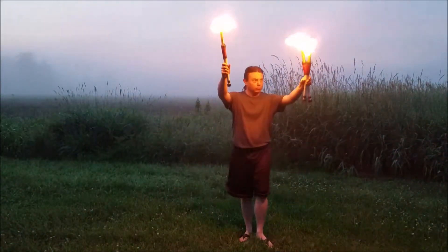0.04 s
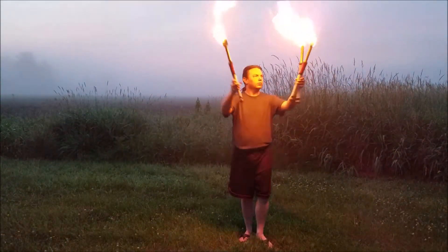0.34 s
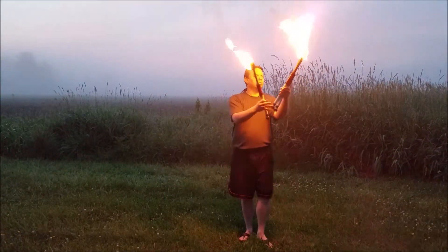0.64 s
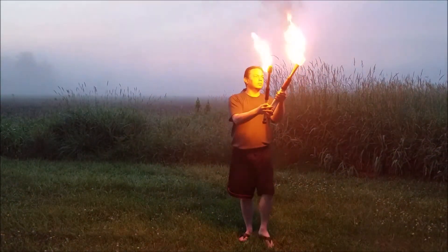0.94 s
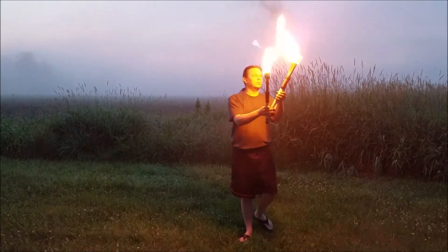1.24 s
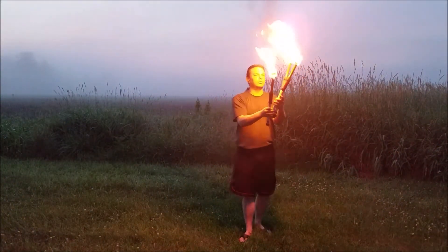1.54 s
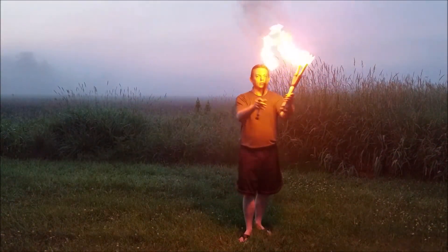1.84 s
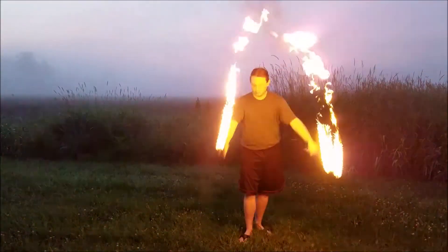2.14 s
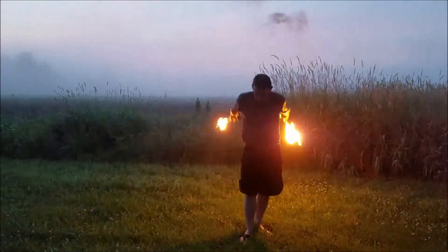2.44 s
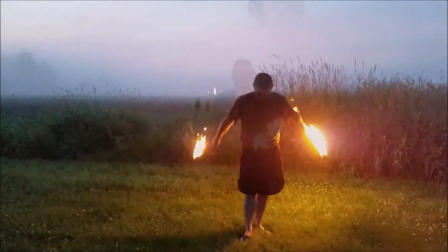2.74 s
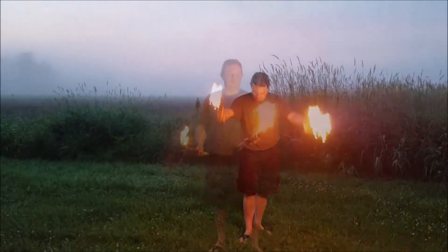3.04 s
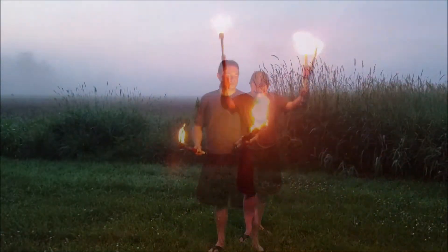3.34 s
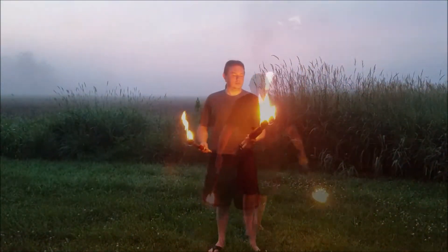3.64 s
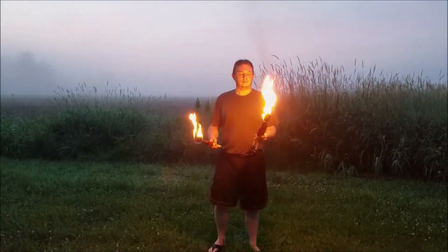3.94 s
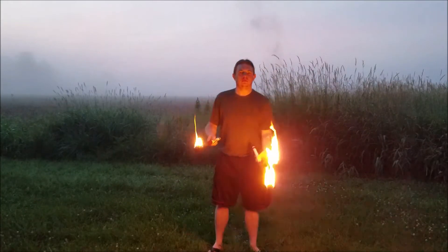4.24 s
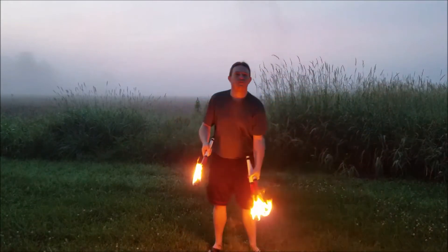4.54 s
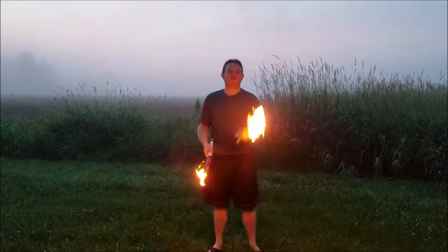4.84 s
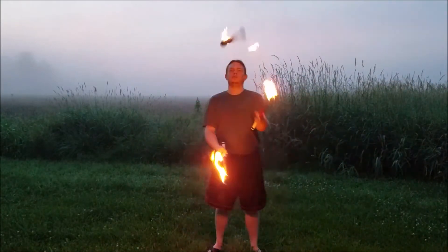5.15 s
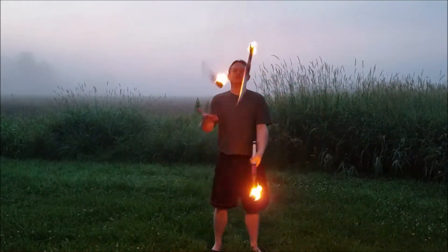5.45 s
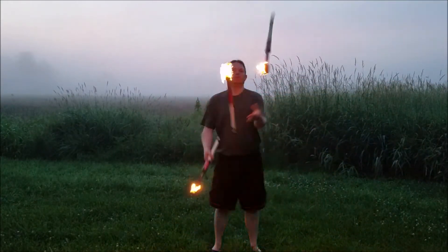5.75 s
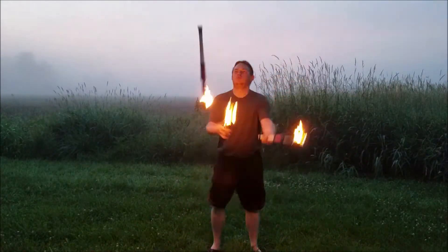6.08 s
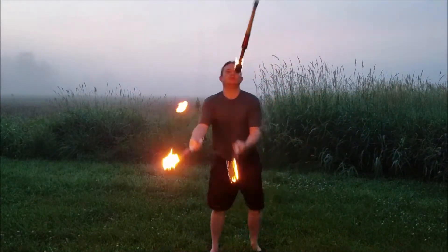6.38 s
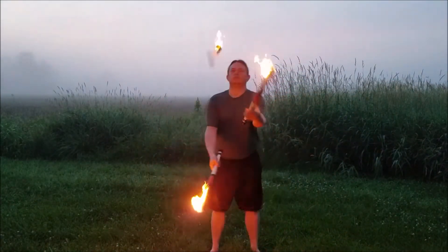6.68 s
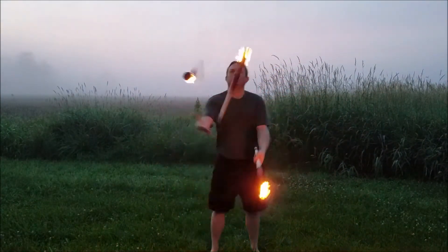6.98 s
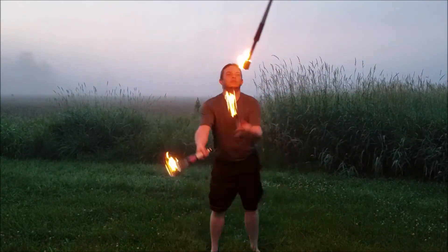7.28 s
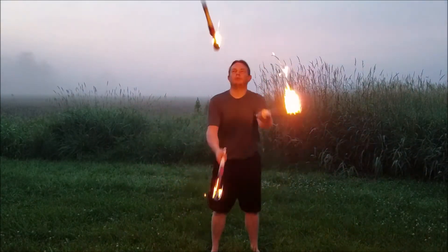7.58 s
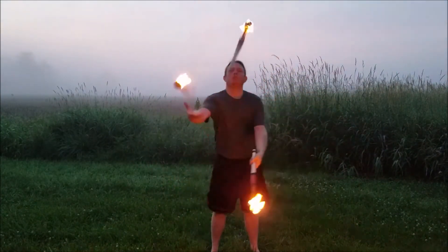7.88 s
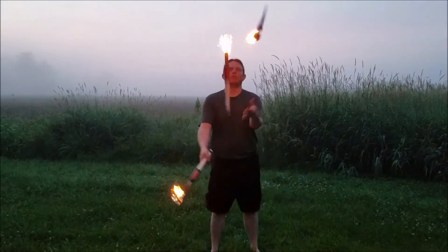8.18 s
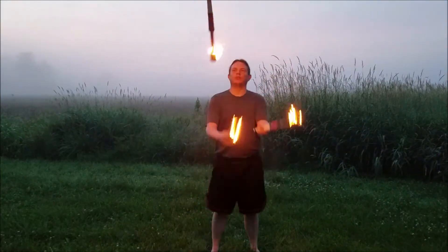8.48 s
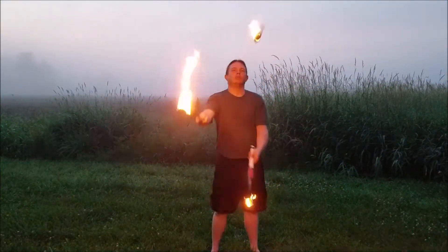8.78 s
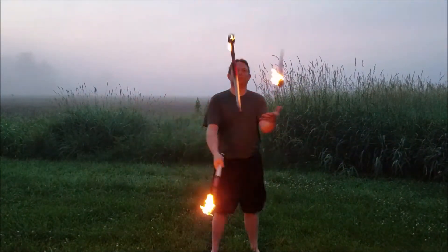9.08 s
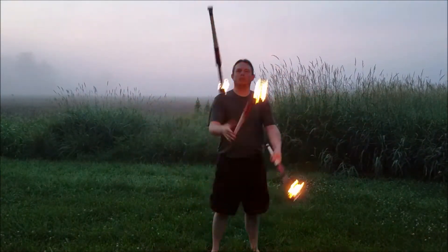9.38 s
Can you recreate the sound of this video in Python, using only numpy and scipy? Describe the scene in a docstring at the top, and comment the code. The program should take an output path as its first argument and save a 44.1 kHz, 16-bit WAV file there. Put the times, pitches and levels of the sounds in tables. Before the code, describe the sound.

Burning torches flutter softly on a lawn, then are swung three times, each swing a low, tearing roar. Juggling follows: lighter flame whooshes in an even rhythm, with handles slapping sharply into palms. The torches are just right of the microphones, with a slight echo. Small birds whistle, chip and trill, busiest near the end, while crickets chirr throughout over the faint rush of an open field.

```python
"""Burning torches, held, swung three times and then juggled on a lawn, just right of the microphones.
Each swing tears the flame into a low, fluttering roar, with a brief low hum at its height.
The handles slap into the palms, and hard surfaces near the lawn throw the sounds back.
Small birds whistle, chip and trill in the reeds, and others twitter far across the misty field.
Crickets scrape their wings all along, over the faint rush of the open field."""
import sys
import numpy as np
from scipy import signal
from scipy.fft import rfft, irfft, next_fast_len
from scipy.io import wavfile
from scipy.ndimage import uniform_filter1d

SR = 44100
rng = np.random.default_rng(int(sys.argv[2]) if len(sys.argv) > 2 else 0)


def to_wav(s):
    """Save 16-bit WAV."""
    ch = np.atleast_2d(s).T  # columns
    pcm = np.round(np.clip(ch, -1, 1) * 32767)  # PCM
    wavfile.write(sys.argv[1], SR, pcm.astype(np.int16))


N = 424241
TIME = np.arange(N) / SR
FRAME_S, BIN_HZ = np.arange(N // 256 + 5) * 256 / SR, np.fft.rfftfreq(1024, 1 / SR)

# a handle lands in a palm: (time [s], relative tick [dB], relative knock [dB], rub against the blow [dB])
CATCHES = [(5.3743, -45.5, -70, -22), (5.4897, -41.5, -70, -29), (5.658, -43.5, -53, -19),
           (6.0156, -41.5, -47, -8), (6.3664, -42, -55, -17), (6.7692, -29.5, -41.5, -27),
           (7.1801, -37, -42, -12), (7.6082, -46, -53, -12), (8.0278, -43, -51, -7),
           (8.4732, -45, -38.5, -1), (8.887, -33, -57, -27), (9.3342, -47, -55, -7)]


def swung_flames(rush_s=0.059):
    """Wide swings of the arms tear the full flames into a roar, with its own brightness at top speed."""
    # wide swings: (peak time [s], rise [s], fall [s], level [dB], brightness [dB], extra at peak [dB])
    swings = [(2.242, 0.15, 0.28, -31.5, -5.5, 16), (2.963, 0.28, 0.35, -33.5, -3, -1.5),
              (3.663, 0.22, 0.33, -33, -3, 9)]
    # spectrum of a full flame: (frequency [Hz], relative level [dB])
    colour = [(20, -28), (35, -33), (58, 0.5), (115, -1.5), (250, -3), (450, -9), (800, -11.5),
              (1300, -19.5), (2200, -26.5), (3500, -33.5), (6000, -44.5), (15000, -50.5)]
    roar_db, bright_db = whooshes([row[:-1] for row in swings], rest_db=-94)
    rush_db = sum(db * np.exp(-((FRAME_S - s) / rush_s) ** 2) for s, *_, db in swings)
    return flame(roar_db, bright_db + rush_db, colour, brightening=0.027, steady_bass=0.095,
                 flutter_db=1.0, flutter_per_s=46, trim_db=-0.73)


def small_flames(jolt_lag_s=0.013, jolt_rise_s=0.022, jolt_fall_s=0.16, jolt_db=-53.5):
    """The flames idle in the hands, whoosh with each throw, and flare when turned or caught."""
    # a torch spins through the air: (peak time [s], rise [s], fall [s], level [dB], brightness [dB])
    throws = [(4.969, 0.14, 0.19, -43, 0.5), (5.387, 0.2, 0.19, -44, -2), (5.748, 0.13, 0.14, -42, 2),
              (6.196, 0.19, 0.22, -44, -3.5), (6.474, 0.12, 0.37, -46, -2), (6.972, 0.14, 0.23, -44.0, -2),
              (7.362, 0.165, 0.24, -45.5, 2), (7.715, 0.18, 0.35, -46.2, -2),
              (8.201, 0.16, 0.188, -43.6, 1), (8.687, 0.32, 0.19, -44, 0.5), (9.0, 0.16, 0.12, -44, -3),
              (9.46, 0.18, 0.22, -42.5, 0)]
    # a torch tips or turns over: (peak time [s], rise [s], fall [s], level [dB], brightness [dB])
    flares = [(0, .1, 0.13, -47, -5.5), (.455, 0.064, 0.15, -50, -5), (.61, 0.083, .22, -55, -5),
              (1.12, 0.17, 0.14, -59, -5), (2.172, .04, 0.078, -37.5, -3.5),
              (2.58, 0.073, 0.03, -46.5, -14), (4.38, 0.03, 0.1, -50.5, 6), (4.484, .06, 0.19, -54, 8),
              (4.822, .045, .09, -50.5, 0), (5.163, .063, .17, -47.5, 4), (5.87, 0.044, 0.07, -47, -7),
              (7.08, 0.036, 0.041, -52, -7), (7.47, .077, .07, -48.5, -14), (7.9, 0.22, 0.16, -49.5, -3),
              (8.08, 0.047, 0.035, -46.5, 2), (8.507, 0.036, .03, -52, -5), (9.08, 0.039, 0.22, -45, 1)]
    # spectrum of a held or spinning flame: (frequency [Hz], relative level [dB])
    colour = [(20, -22), (35, -38), (58, -0.5), (105, -0.5), (140, -3), (200, 2), (290, 1), (450, -3.5),
              (800, -9.5), (1300, -19), (2200, -25.5), (3500, -41), (6000, -41.5), (15000, -42.5)]
    jolts = [(s + jolt_lag_s, jolt_rise_s, jolt_fall_s, jolt_db, 0) for s, *_ in CATCHES]
    frame_samples = np.minimum(FRAME_S * SR, N - 1).astype(int)
    idle_db = -69 + 2.5 * wander(10, N)[frame_samples]
    roar_db, bright_db = whooshes([*throws, *flares, *jolts], idle_db)
    return flame(roar_db, bright_db, colour, brightening=0.041, steady_bass=0.56,
                 flutter_db=2.5, flutter_per_s=70)


def whooshes(moves, rest_db, arch=1.92):
    """Level and brightness of a flame: each move rises and falls 20 dB in the times given."""
    s, rise, fall, db, bright_db = np.transpose(moves)[:, :, None]
    from_peak = abs(FRAME_S - s) / np.where(FRAME_S < s, rise, fall)
    power = gain_of(db - 20 * from_peak ** arch) ** 2  # an arch of 1 is pointed, 2 is a round bell
    total = power.sum(0) + gain_of(rest_db) ** 2
    return 10 * np.log10(total), (power * bright_db).sum(0) / total


def flame(roar_db, bright_db, colour, brightening, steady_bass, flutter_db, flutter_per_s, trim_db=0):
    """Turbulent burning: faster air breaks the flame into smaller, brighter eddies; its sheet flaps."""
    # the flame at the two microphones: (frequency [Hz], left-right likeness [0-1])
    likeness = [(60, 1), (300, 1), (640, 0.96), (1400, 0.72), (3100, 0.24), (7000, 0.033)]
    force = np.maximum(roar_db - np.average(roar_db, weights=gain_of(2 * roar_db)), -12)[:, None]
    upper = read([(200, 0.16), (900, 0.74), (3000, 0.64)], BIN_HZ)
    lower = read([(90, 1), (220, 0.071)], BIN_HZ)
    # the deep rumble of the burning wick swells less than the roar above it
    tilt_db = (brightening * force + bright_db[:, None]) * upper - steady_bass * force * lower
    roar = coloured(air_noise(tilt_db, likeness, patchy_db=3.0), colour)
    roar /= np.sqrt(uniform_filter1d((roar ** 2).mean(0), size=2400) + 1e-20)
    flapping = evened(gain_of(flutter_db * np.tanh(wander(flutter_per_s, N))))
    return roar * flapping * gain_of(np.interp(TIME, FRAME_S, roar_db) + trim_db)


def low_hums(waver_hz=11):
    """Brief, wavering low hums in the roar at the height of a swing or throw."""
    # hums: (time [s], width [s], pitch [Hz], level [dB])
    hums = [(2.30, 0.028, 112.4, -36), (2.98, 0.085, 157.2, -33), (3.0, 0.059, 111.4, -35.5),
            (3.729, 0.045, 111.9, -34), (5.75, 0.054, 91.1, -45.5), (5.76, 0.047, 361.5, -45.5),
            (9.46, 0.05, 298, -43.5)]
    out = np.zeros(N)
    t = np.arange(SR // 2) / SR - 1 / 4
    for s, width, hz, db in hums:
        turns = np.cumsum(hz + waver_hz * wander(47.8, len(t))) / SR
        add(out, s + t[0], gain_of(db) * np.exp(-(t / width) ** 2 / 2) * np.sin(2 * np.pi * turns))
    return out


def handles(tick_boost_db=14, knock_boost_db=26):
    """Each catch is a bright tick, a duller knock of the palm and a short ring; faint rubs lie between."""
    # modes of a handle: (frequency [Hz], relative level [dB], time to fall 60 dB [s])
    modes = [(1098, -6, 0.047), (2300, -11, 0.074), (2780, -9, 0.034)]
    # spectra of the tick and the knock: (frequency [Hz], relative level [dB])
    tick_colour = [(500, -5), (2500, 3.5), (5500, -1), (8000, -0.5), (12000, -3.5), (16000, -0.5)]
    knock_colour = [(100, 7.5), (500, -9), (1100, 2), (1700, -4), (2700, 1), (3800, -10), (5300, -6.5),
                    (7500, -30), (15000, -45)]
    # a faint tick or brief rub of a handle: (time [s], width [s], level [dB])
    touches = [(1.45, 0.087, -71), (4.208, 0.015, -65), (5.445, 0.033, -59.5), (6.26, 0.028, -61.5),
               (7.68, 0.14, -69.5), (9.36, .03, -69)]
    out, t = np.zeros(N), np.arange(4096) / SR
    ring = sum(gain_of(db - 60 * t / t60) * np.sin(2 * np.pi * hz * t) for hz, db, t60 in modes)
    for s, tick_db, knock_db, rub_db in CATCHES:
        tick = gain_of(tick_db + tick_boost_db) * blow(tick_colour, 0.0011, rub_db + 3, rub_s=0.022)
        knock = gain_of(knock_db + knock_boost_db) * blow(knock_colour, 0.0013, rub_db, rub_s=0.011)
        add(out, s - 64 / SR, tick + knock)
        add(out, s, gain_of(knock_db) * ring)
    touching = sum(gain_of(db) * np.exp(-((TIME - s) / width) ** 2 / 2) for s, width, db in touches)
    rasp = coloured(rng.standard_normal(N), tick_colour) * gain_of(3 * wander(300, N))
    return out + touching * evened(rasp)


def blow(colour, crack_s, rub_db, rub_s):
    """A crack, 64 samples in, then the uneven rub of the hand closing round the handle."""
    t = np.arange(4096) / SR
    rub = np.exp(-t / rub_s) * gain_of(rub_db + 4.5 * wander(890, len(t)))
    burst = (np.exp(-t / crack_s) + rub) * rng.standard_normal(len(t))
    slap = coloured(np.pad(burst, (64, 0)), colour)
    return slap / np.linalg.norm(slap)


def echoed(x):
    """Hard surfaces near the lawn throw the juggler's sounds back."""
    # early reflections: (delay [s], level [dB])
    echoes = [(0.0192, -14), (0.0272, -18)]
    out = x.copy()
    for delay_s, db in echoes:
        add(out, delay_s, gain_of(db) * x)
    return out


def whistling_birds(lead_s=.045, slur_s=.06, step_s=.054, fall_s=.12, high_s=0.119, low_s=0.0553):
    """Birds in the reeds whistle stepped calls, long falls, high-low pairs and plain notes."""
    # a faint lead-in, a slur, a step down: (time [s], pitch [Hz], slur level [dB], step level [dB])
    step_calls = [(.645, 2376, -53, -55.5), (1.703, 2380, -56, -56), (3.372, 2330, -53.5, -65)]
    # one long falling whistle, always the same: (time [s], level [dB])
    falls = [(.905, -67), (6.318, -63), (7.224, -62.5)]
    # a thin high note, then a louder low one:
    # (time [s], gap [s], high pitch [Hz], low pitch [Hz], low note level [dB], left over right [dB])
    pairs = [(6.363, 0.14, 7830, 4563, -45, 10), (6.827, 0.13, 7770, 4510, -42.5, 6.5),
             (7.225, .104, 7600, 4470, -43, 3)]
    # plain notes: (time [s], length [s], start [Hz], end [Hz], level [dB], left over right [dB])
    whistles = [(0.308, 0.064, 2650, 2314, -67, -0.5), (1.453, 0.13, 2830, 2700, -64, 2),
                (1.974, 0.22, 2750, 2570, -61, 1), (2.0, 0.18, 3210, 3010, -67, 0.5),
                (5.0, .027, 2490, 2430, -47.5, -4), (7.483, .059, 3320, 2900, -63, .5),
                (8.072, 0.065, 6563, 6580, -41.5, 2.5), (8.147, 0.051, 6570, 6560, -53, 1),
                (8.833, 0.094, 2904, 2743, -45, 2), (8.968, 0.028, 2550, 2110, -48, 0),
                (9.01, 0.061, 2520, 2304, -48.5, 0)]
    out = np.zeros((2, N))
    for s, hz, slur_db, step_db in step_calls:
        add(out, s - lead_s, note(lead_s, 1.47 * hz, 1.32 * hz, 1.2 * hz, slur_db - 11))
        add(out, s, note(slur_s, 1.19 * hz, 1.02 * hz, 1.005 * hz, slur_db))
        add(out, s + slur_s, note(step_s, .84 * hz, .803 * hz, .812 * hz, step_db))
    for s, db in falls:
        add(out, s, note(fall_s, 3210, 2810, 2330, db))
    for s, gap_s, high_hz, low_hz, db, side_db in pairs:
        add(out, s, placed(note(high_s, high_hz + 260, high_hz, high_hz + 70, db - 16), side_db))
        add(out, s + gap_s, placed(note(low_s, low_hz + 30, low_hz, low_hz + 60, db), side_db))
    for s, length, start_hz, end_hz, db, side_db in whistles:
        add(out, s, placed(note(length, start_hz, (start_hz + end_hz) / 2, end_hz, db), side_db))
    return out


def chipping_birds(chip_period_s=.118, pip_hz=3360, pip_scatter_hz=55):
    """Birds in the reeds repeat short syllables at an even pace."""
    # runs of a chip made of a level pip, a steep fall and a soft lilt:
    # (time of first fall [s], chips [count], level [dB])
    chip_runs = [(.014, 3, -49.5), (2.713, 2, -47.5), (9.004, 5, -48)]
    # runs of one steep slur: (time [s], slurs [count], period [s], length [s],
    # start [Hz], middle [Hz], end [Hz], level [dB], left over right [dB])
    slur_runs = [(8.396, 3, .094, .019, 4200, 3640, 3350, -47, -2.5),
                 (8.628, 5, .0692, .032, 4020, 2950, 2560, -50.5, -6)]
    out = np.zeros((2, N))
    for start, count, db in chip_runs:
        for s in start + chip_period_s * np.arange(round(count)):
            hz = pip_hz + pip_scatter_hz * rng.standard_normal()
            add(out, s - .026, placed(note(0.022, hz - 40, hz, hz, db - 2), side_db=-5.0))
            add(out, s, placed(note(0.024, 4274, 3290, 2700, db + 2), side_db=0.75))
            add(out, s + 0.0375, placed(note(0.0248, 4320, 4400, 4950, db - 8), side_db=-1.4))
    for start, count, period, *shape, side_db in slur_runs:
        for s in start + period * np.arange(round(count)):
            add(out, s, placed(note(*shape), side_db))
    return out


def trilling_birds(throb_db=5, slow_per_s=25):
    """The pitch swings quickly up and down; the slower the swing, the more the syllables part."""
    # trills and buzzes: (time [s], length [s], start [Hz], end [Hz], swing [Hz], swing rate [1/s],
    # roughness [ratio], level [dB], left over right [dB])
    trills = [(1.66, 0.072, 5880, 5470, 450, 170, 0.74, -58, -0.5),
              (3.046, 0.032, 5740, 5600, 450, 150, 1.1, -56, 2),
              (4.585, 0.055, 6030, 5360, 400, 240, 0.76, -61, -2.5),
              (4.667, 0.38, 2923, 2724, 188, 28.3, 0.35, -48, -4.5),
              (5.019, 0.037, 5770, 5630, 450, 170, 1.05, -54.5, -2.5),
              (7.456, 0.084, 5340, 5460, 537, 127, 0.26, -48, 6),
              (7.551, .46, 5320, 5040, 550, 130, 0.6, -54.5, 3.5),
              (8.2, 0.194, 3210, 3244, 173, 81, 0.66, -47, 1.5),
              (8.633, 0.062, 3190, 3250, 160, 96, 0.5, -49, 0.5)]
    out = np.zeros((2, N))
    for s, length, start_hz, end_hz, swing_hz, per_s, rough, db, side_db in trills:
        t = np.arange(round(length * SR)) / SR
        swing = np.sin(2 * np.pi * per_s * t)
        hz = np.linspace(start_hz, end_hz, len(t)) + swing_hz * (swing + rough * wander(1200, len(t)))
        throb = gain_of(throb_db * slow_per_s / per_s * swing)  # each syllable is loudest at its top
        add(out, s, placed(whistle(hz, db, edge=0.13, loudness=throb, second_db=-21.5), side_db))
    return out


def note(length, start_hz, middle_hz, end_hz, db):
    """A bird slurs one slightly unsteady note through three pitches."""
    progress = np.linspace(0, 1, max(round(length * SR), 64))
    hz = np.polyval(np.polyfit([0, .5, 1], [start_hz, middle_hz, end_hz], 2), progress)
    return whistle(hz + 9 * wander(300, len(hz)), db)


def whistle(hz, db, edge=0.27, loudness=1, second_db=-42, third_db=-22):
    """A bird's almost pure tone along a pitch curve; its faint overtones grow on the high notes."""
    angle = 2 * np.pi * np.cumsum(hz) / SR
    overtones = sum(gain_of(part_db) * np.sin(k * angle) * (k * hz < SR / 2)
                    for k, part_db in ((2, second_db), (3, third_db)))
    tone = np.sin(angle) + read([(3400, .1), (4400, 1)], hz) * overtones
    return gain_of(db) * evened(loudness * tone * signal.windows.tukey(len(hz), edge))


def crickets(count=12, centre_hz=4667, spread_hz=130, scatter_hz=70, sag_hz=170, level_db=-57):
    """Each cricket scrapes a ringing wing in rapid strokes; the pitch sags along every stroke."""
    out = np.zeros((2, N))
    for k, rank in enumerate((np.arange(count) + .5) / count):
        strokes_per_s = rng.uniform(28, 70) * (1 + .1 * wander(12, N))
        stroke = np.cumsum(strokes_per_s) / SR % 1
        own_hz = centre_hz + spread_hz * np.log(rank / (1 - rank)) / 2
        hz = own_hz + scatter_hz * wander(400, N) - sag_hz * (stroke - .5)
        angle = (2 * np.pi * (np.cumsum(hz) / SR % 1)).astype(np.float32)
        wing = np.sin(angle) + gain_of(-22) * np.sin(2 * angle) + gain_of(-32) * np.sin(3 * angle)
        song = wing * (4 * stroke * (1 - stroke)) ** 2
        at_microphones = np.array([song, np.roll(song, rng.integers(-12, 13))])
        out += panned(at_microphones, side_db=6 * (-1) ** k)
    return gain_of(level_db) * evened(panned(out, side_db=-4.5))


def far_birds(spread_db=9):
    """A twitter of faint, quick slurs carries from across the field."""
    # runs of slurs: (from [s], to [s], rate [1/s], lowest pitch [Hz], highest pitch [Hz], level [dB])
    runs = [(0, 9.6, 18, 2000, 3600, -69.5), (0, .4, 45, 2100, 3900, -65), (4.1, 4.55, 60, 2200, 3700, -69),
            (7.2, 8.0, 40, 2500, 3800, -67), (8.0, 9.1, 45, 2200, 4200, -62.5),
            (8.05, 8.65, 25, 4300, 5200, -70)]
    out = np.zeros((2, N))
    for start, stop, per_s, low_hz, high_hz, db in runs:
        count = round(per_s * (stop - start))
        for when, length, pitch, slope, size, side in rng.random((400, 6))[:count]:
            hz = low_hz + (high_hz - low_hz) * pitch
            slur = .26 * (slope - .4)
            chirp_db = db + spread_db * (size - .5)
            chirp = note(.015 + .05 * length ** 2, hz * (1 + slur), hz, hz * (1 - slur), chirp_db)
            add(out, start + when * (stop - start), placed(chirp, side_db=8 * (side - .5)))
    return out


def open_field(level_db=-58.5):
    """The faint, mottled rush of the open field, all round the microphones."""
    # spectrum of the field: (frequency [Hz], relative level [dB])
    colour = [(20, -6), (70, -3), (200, -11), (500, -17), (1000, -19), (1600, -21), (2800, -15),
              (3800, -17), (5000, -14), (5600, -27), (7500, -34), (10500, -33.5), (15500, -26)]
    # the field at the two microphones: (frequency [Hz], left-right likeness [0-1])
    likeness = [(60, 0.83), (130, 0.65), (290, 0), (640, 0), (1400, 0.14), (3100, 0)]
    return gain_of(level_db) * evened(coloured(air_noise(0, likeness, patchy_db=4.0), colour))


def scattered(x, t60, wet_db):
    """Reeds and trees return a thin tail, different at each microphone."""
    t = np.arange(SR * 3 // 4) / SR
    sparse = rng.standard_normal((2, len(t))) * (rng.random((2, len(t))) < 1 / 16)
    taps = sparse * gain_of(-60 * t / t60) * (t > .005)
    return x + gain_of(wet_db) * signal.fftconvolve(x, taps / np.linalg.norm(taps[0]), axes=1)[:, :N]


def placed(x, side_db, max_lead_s=0.00025):
    """A bird off to one side is louder and earlier at the nearer microphone."""
    padded = next_fast_len(len(x) + 32, True)
    delay_s = np.array([[-.5], [.5]]) * max_lead_s * np.tanh(side_db / 1.5)
    shift = np.exp(-2j * np.pi * np.fft.rfftfreq(padded, 1 / SR) * delay_s)
    return panned(irfft(rfft(x, padded) * shift, padded), side_db)


def panned(x, side_db):
    """Places a sound by level; positive is left."""
    return x * gain_of([[side_db / 2], [-side_db / 2]])


def air_noise(level_db, likeness, patchy_db):
    """Stereo noise under a time-frequency level, mottled by drifting patches."""
    a, b, c, d, patches = rng.standard_normal((5, len(FRAME_S), len(BIN_HZ)))
    patches = evened(uniform_filter1d(uniform_filter1d(patches, size=7, axis=0), size=5, axis=1))
    same = np.clip(read(likeness, BIN_HZ), 0, .998)
    left = a + 1j * b
    right = same * left + np.sqrt(1 - same ** 2) * (c + 1j * d)
    spectra = np.array([left, right]) * gain_of(level_db + patchy_db * patches)
    return signal.istft(spectra, nperseg=1024, noverlap=768, time_axis=1, freq_axis=2)[1][:, :N]


def wander(per_s, size):
    """Random drift of rms about 1 that takes a new value per_s times a second."""
    step = np.arange(size) * per_s / SR
    knots = np.random.default_rng(rng.integers(2 ** 20)).standard_normal(int(step[-1]) + 2)
    return np.interp(step, np.arange(len(knots)), knots)


def coloured(x, points):
    """Filters by a spectrum."""
    size = x.shape[-1]
    padded = next_fast_len(size, True)
    response = gain_of(read(points, np.fft.rfftfreq(padded, 1 / SR)))
    return irfft(rfft(x, padded) * response, padded)[..., :size]


def read(points, hz):
    """Reads a spectrum on a logarithmic frequency axis."""
    point_hz, value = np.transpose(points)
    return np.interp(np.log(hz + 1), np.log(point_hz), value)


def add(mix, s, sound):
    """Mixes a sound in at time s."""
    start = round(s * SR)
    sound = sound[..., max(-start, 0):]
    part = mix[..., max(start, 0):][..., :sound.shape[-1]]
    part += sound[..., :part.shape[-1]]


def gain_of(db):
    """Decibels to amplitude."""
    return 10 ** (np.asarray(db) / 20)


def evened(x):
    """Scales to rms 1."""
    return x / np.sqrt(np.mean(x ** 2) + 1e-20)


def scene():
    """The juggler on the lawn slightly right of centre, birds in the reeds, the field all round."""
    fire = swung_flames() + small_flames() + low_hums()
    hands = scattered(panned(handles(), side_db=-0.5), t60=0.2, wet_db=-5.5)
    juggler = echoed(panned(fire, side_db=-2.5) + hands)
    twitter = scattered(far_birds(), t60=.4, wet_db=-4)
    singers = whistling_birds() + chipping_birds() + trilling_birds()
    through_reeds = gain_of(-1.5) * scattered(singers, t60=.12, wet_db=-6)
    birds = scattered(through_reeds, t60=0.61, wet_db=-9)
    field = panned(open_field(), side_db=-1.5)
    return juggler + birds + twitter + crickets() + field


def record(dry):
    """The recorder passes nothing above about 16 kHz."""
    band_limit = signal.firwin(511, 15850, window=("kaiser", 9), fs=SR)
    return signal.oaconvolve(dry, band_limit[None], "same", axes=1)


dry = scene()
out = record(dry)
to_wav(out)
```